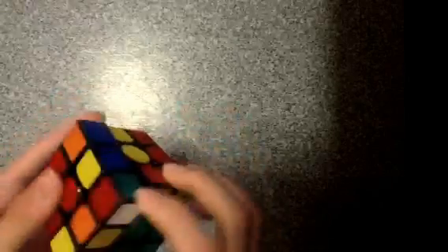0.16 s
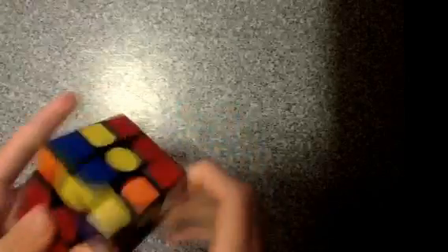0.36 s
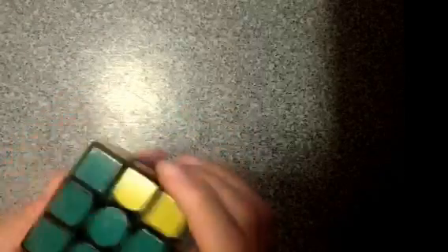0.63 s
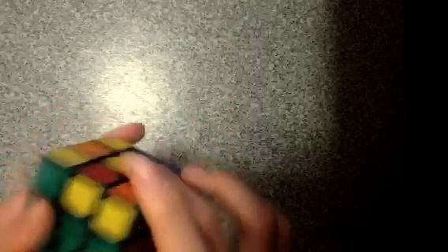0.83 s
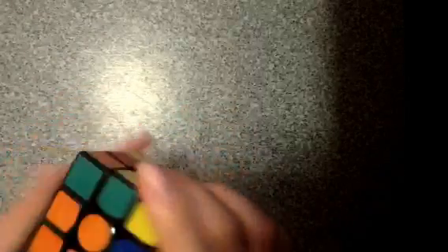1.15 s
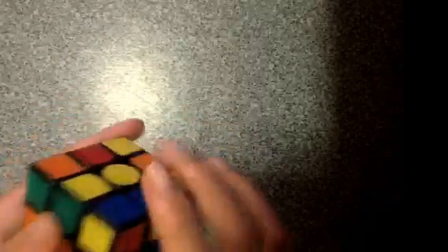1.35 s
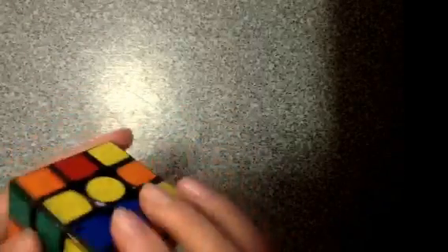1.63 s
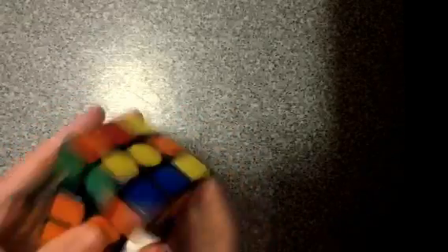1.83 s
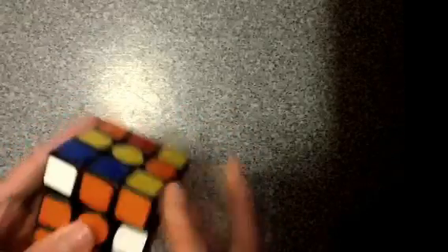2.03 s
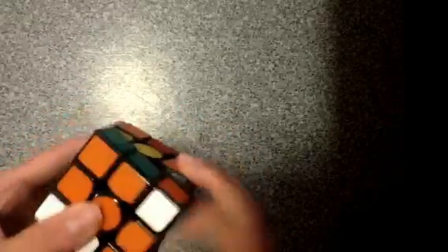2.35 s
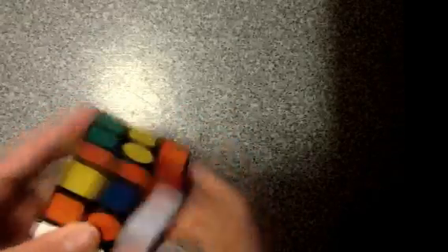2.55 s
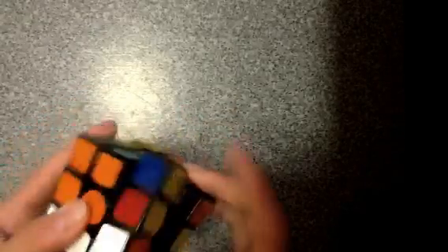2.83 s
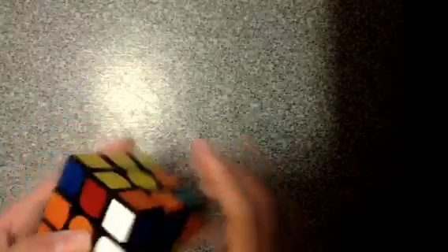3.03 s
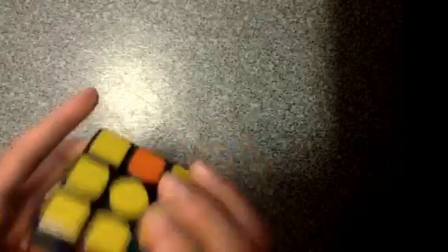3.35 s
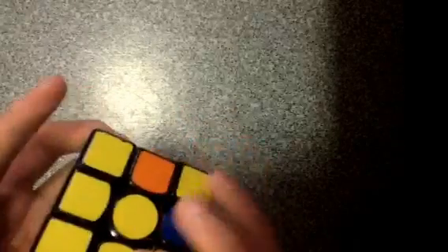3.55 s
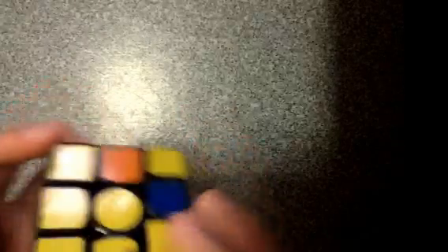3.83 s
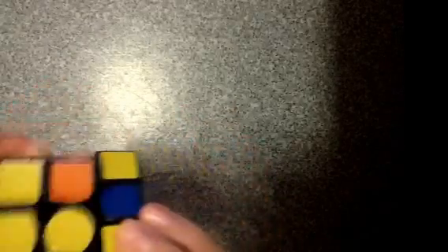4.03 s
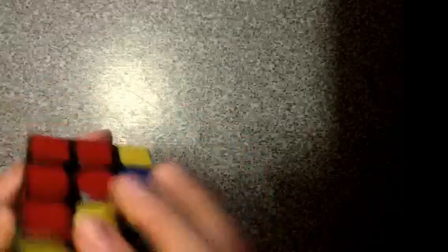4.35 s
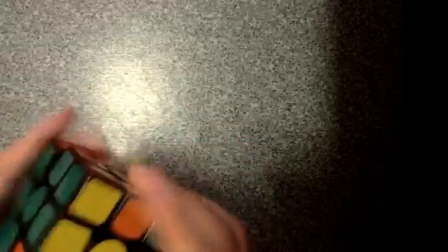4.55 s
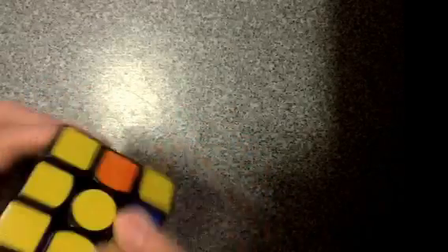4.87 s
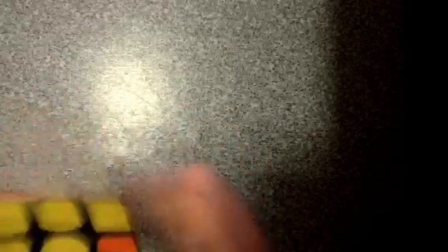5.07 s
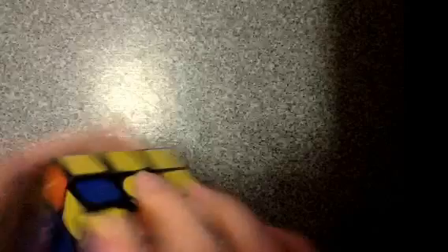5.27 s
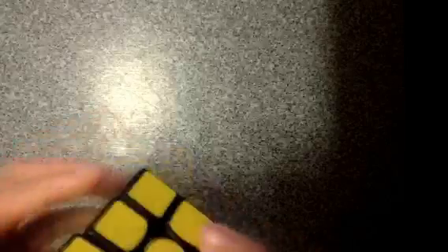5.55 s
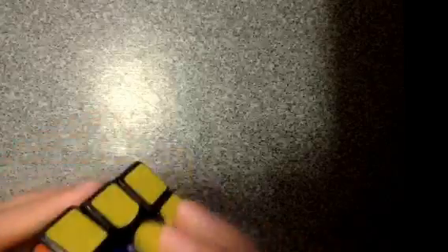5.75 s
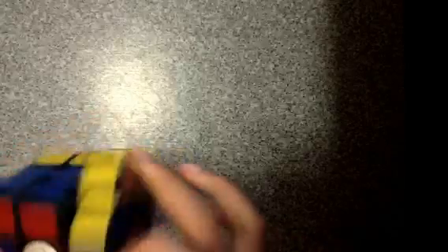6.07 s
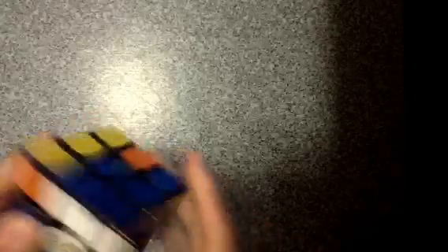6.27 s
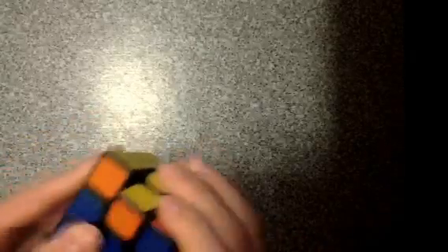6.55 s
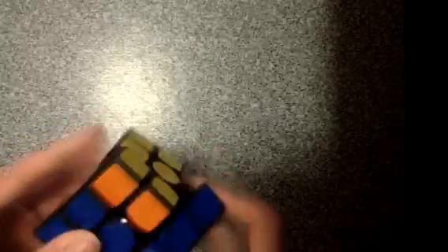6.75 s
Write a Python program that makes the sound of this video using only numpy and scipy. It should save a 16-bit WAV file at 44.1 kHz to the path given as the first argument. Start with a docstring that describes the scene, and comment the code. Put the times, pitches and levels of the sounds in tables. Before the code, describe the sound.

A plastic puzzle cube is twisted by hand in quick uneven bursts of sharp clacks and scrapes, close up over a faint indoor hum.

```python
"""At a desk in a small room, a plastic speed cube is turned by hand in quick bursts, heard close up.
Noise bursts ringing through resonances make the clacks, the seam rattle and the loose ticks.
Gritty friction noise makes the scrapes and soft rubbing; wavering sine tones make faint squeaks.
The room answers with a short diffuse tail, over a fan of unsteady low tones and soft air."""
import sys
import numpy as np
from scipy import signal
from scipy.fft import rfft, irfft, next_fast_len
from scipy.io import wavfile
from scipy.ndimage import uniform_filter1d, map_coordinates

SR = 44100
rng = np.random.default_rng(int(sys.argv[2]) if len(sys.argv) > 2 else 0)


def materialize(psi):
    """Save the field psi as 16-bit PCM at rate SR to the path in sys.argv[1].

    A 1-D psi becomes a single channel; in a 2-D psi each row is a channel.
    """
    bounded = np.clip(np.atleast_2d(psi).T, -1, 1)
    quanta = np.round(bounded * 32767).astype(np.int16)
    wavfile.write(sys.argv[1], SR, quanta)


N = 304290  # length in samples

# All source levels below are set ahead of the trims in the functions and the mix.
# A piece catches or drops into line: start_s, level_db (rms of the first 3 ms), brightness_db
CLACK_EVENTS = [(0.0279, -31.5, -3.5), (0.039, -29, 4), (0.099, -26, 3), (0.113, -20, 7), (0.1192, -12, 4),
                (0.2598, -42.5, 0), (0.3147, -48, -2), (0.3682, -41.5, 3.5), (0.4268, -30.5, -2.5),
                (0.443, -24, 1), (0.4677, -29.5, 6), (0.4968, -33, 0), (0.5191, -22.5, 4),
                (0.8943, -48.5, -7), (1.0383, -53, -10), (1.28, -54, -8), (1.768, -34.5, 4),
                (1.7949, -33, -0.5), (1.9146, -29, 3), (1.9415, -32.5, -12), (2.147, -50.5, -7),
                (2.2802, -29.5, 4.5), (2.293, -27, 2), (2.303, -25, 6), (2.3595, -40, 3), (2.405, -32.5, 5),
                (2.5005, -32, 4), (2.5088, -19, 5.5), (2.568, -24, 1), (2.5784, -23.5, 5.5),
                (2.5902, -26.5, 0), (2.632, -34, -6), (2.646, -29.5, 5.5), (2.8063, -38, -0.5),
                (2.8568, -39, -13), (2.8668, -42, 4), (2.9494, -13.5, 5), (2.9595, -20.5, 9),
                (3.1926, -41.5, -5), (3.233, -28.5, 1.5), (3.455, -52, -3), (3.632, -51.5, -2.5),
                (4.0792, -41.5, -2), (4.1632, -33.5, 2), (4.2977, -34, 3.5), (4.504, -48.5, -14),
                (4.562, -50.5, -8), (4.6792, -43, -5), (4.766, -30.5, -1), (4.851, -24.5, 0.5),
                (4.8597, -22, 1.5), (4.9825, -46.5, -7), (5.162, -39, 9), (5.1995, -46, -5),
                (5.5308, -44.5, -5.5), (5.7213, -45.5, 6.5), (5.848, -41.5, -5), (5.8943, -30.5, 3),
                (5.9115, -30, 2), (5.921, -35, -3), (5.981, -36.5, 2), (6.007, -29, 0),
                (6.0157, -27.5, 0.5), (6.037, -27.5, 11), (6.0607, -23, 6), (6.0723, -19.5, 2.5),
                (6.121, -29, 1), (6.126, -26, 0), (6.182, -41, -6), (6.2335, -36.5, 0), (6.3687, -47.5, -1),
                (6.4027, -38.5, -5), (6.4541, -41, -12), (6.489, -26, 0.5), (6.5964, -36.5, 2),
                (6.6596, -39.5, -6), (6.7233, -31.5, 2.5), (6.775, -40.5, 2), (6.7985, -43, -6),
                (6.8314, -32, 3), (6.8531, -21.5, 2)]
# A layer slides round over the seams: start_s, end_s, scrape_end_db, rattle_db
LAYER_TURNS = [(0, 0.038, -38.5, -37), (0.096, 0.128, -27.5, -30.5), (0.424, 0.469, -38.5, -42),
               (0.496, 0.54, -33, -40), (1.763, 1.782, -49, -41.5), (1.88, 1.956, -44.5, -42),
               (2.28, 2.317, -33, -31), (2.465, 2.523, -54, -37.5), (2.544, 2.606, -33.5, -38),
               (2.626, 2.659, -38, -36), (2.683, 2.727, -38, -33.5), (2.912, 2.939, -41, -42.5),
               (2.939, 2.959, -20.5, -30), (4.814, 4.837, -41.5, -43), (4.843, 4.868, -30, -31),
               (5.86, 5.946, -40, -35.5), (5.997, 6.078, -49, -43), (6.117, 6.238, -47, -41.5),
               (6.446, 6.475, -50, -39), (6.689, 6.733, -46.5, -45.5), (6.812, 6.861, -37.5, -43)]
# The layers rub while the hands work the cube: start_s, end_s, level_db
RUB_SPELLS = [(0, 0.5, -54), (1.741, 1.95, -57.5), (2.268, 2.74, -56.5), (4.77, 4.853, -59),
              (5.837, 6.23, -52), (6.41, 6.9, -58.5)]
# Faint squeaks as the grip shifts: start_s, length_s, pitch_hz (average), level_db (rms)
GRIP_SQUEAKS = [(3.68, .12, 3690, -75), (4.681, 0.073, 3040, -70), (5.363, 0.1, 3150, -67),
                (5.744, 0.14, 3249, -67.5), (6.255, .1, 2550, -69.5), (6.515, .12, 3260, -66)]
# Colour of a contact between the plastic walls: frequency_hz, gain_db
SHELL_COLOUR = [(25, -66.5), (150, -23), (450, -22.5), (850, -7.5), (1500, -3), (2400, -3), (4200, -1.5),
                (6200, 1.5), (8200, 0), (10500, -6.5), (15000, -7.5)]
# Resonances of the hollow cubies and their walls: frequency_hz, width_hz, height_db (over the shell colour)
CUBIE_MODES = [(1641, 78, 9), (1804, 130, 3.5), (2400, 90, 4), (2597, 30, 1.5), (3140, 80, 4.5),
               (4800, 73, -1), (5950, 100, 2.5), (7540, 71, 3), (8110, 120, 1.5), (9020, 82, 5),
               (9490, 120, -0.5), (11000, 80, 2.5)]
# Colour of soft rubbing: frequency_hz, gain_db
RUB_COLOUR = [(100, -52.5), (700, -11), (1300, -4), (1680, -1.5), (2100, -8.5), (2700, -8), (6000, -10.5),
              (15000, -14)]
# Decay of the room tail: frequency_hz, t60_s
ROOM_DECAY = [(300, 0.46), (1600, 0.23), (4000, 0.24), (8000, 0.28), (15000, 0.2)]
# Low tones of the fan: frequency_hz, level_db (rms), width_hz
FAN_TONES = [(102.7, -76.5, 5), (146, -64.5, 10), (159.3, -65, 6), (190, -62, 8), (200.8, -66, 11),
             (300.9, -62.5, 9), (432.5, -68, 16), (654, -73, 13), (891, -71.5, 15)]
# Relative colour of the fan's air: frequency_hz, density_db (per Hz)
FAN_AIR = [(25, -28.5), (55, -24.5), (75, -15), (110, -3.5), (170, 0), (250, -3), (450, -2), (650, -8),
           (1000, -9.5), (2000, -17), (4000, -23), (7500, -26), (10000, -26.5), (15000, -28.5)]

CONTACT_SAMPLES = 4096  # length of one contact sound
LEAD_S = 0.012  # catching ahead of the snap
SEAM_GAP_S, SEAM_SCATTER_DB = 0.008, 2.5  # average time from seam to seam, spread of their strength
RUB_RISE_DB_PER_S, RUB_FALL_DB_PER_S = 400, 180
# the whole fan sinks for a moment and recovers
DIP_S, DIP_DB, DIP_FALL_S, DIP_RECOVER_S = 2.93, -3, 0.067, 2.2
FAN_TRIM_DB = 0.22
TOP_HZ = 15350  # start of the steep treble cut


def clacks(loose_db=-60, loose_scatter_db=3, loose_bright_db=-5, count=20):
    """Pieces catch on each other and drop into line; loose ones tick faintly as the grip shifts."""
    track = np.zeros(N)
    for start_s, level_db, bright_db in CLACK_EVENTS:
        add(track, start_s - LEAD_S, contact(level_db, bright_db))
    for start_s in rng.random(count) * N / SR:
        level_db = loose_db + loose_scatter_db * rng.standard_normal()
        add(track, start_s, contact(level_db, loose_bright_db))
    return track


def contact(level_db, bright_db, soft_db=-30, hard_db=-15,
            hollow_db=1.5, hollow_per_bright=0.8, sharp_db=1.0, sharp_per_bright=1.2):
    """A click of a given level: the brighter it is, the less it stirs the cavities."""
    force = np.interp(level_db, [soft_db, hard_db], [0, 1])
    hollow = hollow_db - hollow_per_bright * bright_db
    sharp = sharp_db + sharp_per_bright * bright_db
    return amp(level_db) * click(hollow, sharp, force)


def click(hollow_db, sharp_db, force, body_hz=760, body_width_hz=300, body_db=7.0,
          t60=0.02, snap_t60=0.0051, snap_db=4.0, catch_db=-11, catch_t60=0.025,
          landing_s=0.0009, touch_s=0.0004, edge_db=3.0):
    """One contact: after a short catch, a snap and a brief clatter ring the hollow cubies."""
    time = np.arange(CONTACT_SAMPLES) / SR - LEAD_S
    distance = np.abs(time)
    # the edges grate ever harder, then let go and strike
    catch = amp(catch_db - 60 * distance / catch_t60)
    clatter = amp(-60 * distance / t60)
    envelope = np.where(time < 0, catch, clatter)
    # a light touch snaps at once, a hard blow lands more gradually and dies more slowly
    landing = np.exp(-(time / (touch_s + force * landing_s)) ** 2) * (time < 0)
    snap = (time >= 0) * amp(-60 * distance / (snap_t60 * (1 + force)))
    envelope += amp(snap_db) * (landing + snap)
    # the edges chatter as they meet
    knots = CONTACT_SAMPLES // 40
    chatter = np.interp(np.arange(CONTACT_SAMPLES), np.linspace(0, CONTACT_SAMPLES, knots),
                        rng.uniform(-1, 1, knots))
    envelope *= amp(edge_db * chatter)
    # flat contacts stir the cavities, corner contacts the treble
    spot_colour = [(400, 0.019), (1100, hollow_db), (2000, hollow_db),
                   (3200, 0.0092), (7500, 0), (10500, sharp_db)]
    # the harder the blow, the more it shakes the whole cube
    modes = list(CUBIE_MODES) + own_modes() + [(body_hz, body_width_hz, force * body_db)]
    burst = rng.uniform(-0.97, 1, CONTACT_SAMPLES) * envelope
    sound = coloured(burst, lambda f: along(SHELL_COLOUR, f) + along(spot_colour, f) + resonance(f, modes))
    first_3_ms = sound[(time > 0) & (time < 0.003)]
    return sound / np.sqrt(np.mean(first_3_ms ** 2))


def own_modes(low_hz=1300, high_hz=8000, relative_width=0.078, height_db=5.0, count=4):
    """Each piece, struck at another spot, adds a few resonances of its own."""
    centres = low_hz * (high_hz / low_hz) ** rng.random(count)
    return [(hz, relative_width * hz, height_db) for hz in centres]


def rattle(bright_db=-0.5, bright_scatter_db=4):
    """A turning layer ticks over the seams at uneven intervals."""
    track = np.zeros(N)
    for start_s, end_s, _, level_db in LAYER_TURNS:
        seams = max(1, round((end_s - start_s) / SEAM_GAP_S))
        for k in range(seams):
            seam_s = start_s + (end_s - start_s) * (k + rng.random()) / seams
            strength, colour = rng.standard_normal(2)
            tick = contact(level_db + SEAM_SCATTER_DB * strength, bright_db + bright_scatter_db * colour)
            add(track, seam_s - LEAD_S, tick)
    return track


def scrapes(grain_db=5.5, rise_db=5, level_db=-1.5, hollow_db=2, rub_db=-2, rub_grain_db=9.0):
    """Sliding layers drag over the seams, harder until they stop; soft rubbing joins as the hands work."""
    t = np.arange(N) / SR
    drag = np.zeros(N)
    for start_s, end_s, end_db, _ in LAYER_TURNS:
        times = [start_s - 0.004, start_s, end_s, end_s + 0.006]
        drag += amp(np.interp(t, times, [-120, end_db - rise_db, end_db, -120]))
    flat_contact = [(800, 0), (1600, hollow_db), (3000, 0)]
    scrape = unit(filtered(grating(grain_db), lambda f: amp(
        along(SHELL_COLOUR, f) + along(flat_contact, f) + resonance(f, CUBIE_MODES))))

    pressure = np.zeros(N)
    for start_s, end_s, spell_db in RUB_SPELLS:
        rise = RUB_RISE_DB_PER_S * np.maximum(start_s - t, 0)
        fall = RUB_FALL_DB_PER_S * np.maximum(t - end_s, 0)
        pressure += amp(spell_db - rise - fall)
    rub = unit(filtered(grating(rub_grain_db), lambda f: amp(
        along(RUB_COLOUR, f) + resonance(f, CUBIE_MODES))))
    return amp(level_db) * drag * scrape + amp(rub_db) * pressure * rub


def grating(grain_db):
    """Friction noise of rms 1 that sticks and slips every few milliseconds, with a limit to the grip."""
    grip = np.minimum(wobble(700) + wobble(170), 2)
    return unit(rng.standard_normal(N) * amp(grain_db * grip))


def squeaks(waver=0.015, rough=0.062):
    """Plastic sticks and slips on plastic in a thin, unsteady tone that swells and fades."""
    track = np.zeros(N)
    # running time with slow and fast pitch wander
    bent_time = np.cumsum(1 + waver * wobble(40) + rough * wobble(900)) / SR
    for start_s, length_s, pitch_hz, level_db in GRIP_SQUEAKS:
        span = slice(round(start_s * SR), round((start_s + length_s) * SR))
        tone = np.sin(2 * np.pi * pitch_hz * bent_time[span])
        add(track, start_s, amp(level_db) * unit(tone * signal.windows.tukey(len(tone))))
    return track


def room(x, gap_s=0.006, size=256, ring_share=0.28):
    """A diffuse field stores the energy of each band and lets it die away as fresh noise."""
    hz, t, bands = signal.stft(x, SR, nperseg=size)
    power = np.abs(uniform_filter1d(np.abs(bands) ** 2, size=9, axis=0))
    # share of the energy that survives each frame
    kept = amp(-60 * t[1] / along(ROOM_DECAY, hz)) ** 2
    stored = np.array([signal.lfilter([1 - k], [1, -k], band) for k, band in zip(kept, power)])
    noise = signal.stft(rng.standard_normal(N), SR, nperseg=size)[2]
    tail = signal.istft(noise / noise.std() * np.sqrt(stored), SR)[1]
    wet = np.zeros(N)
    add(wet, gap_s, tail)
    # the tail carries the pitch of the cubies with it
    walls = [(500, -9), (1650, 1.5), (3500, -1), (7000, -2.0), (14000, -2.0)]
    return filtered(wet, lambda f: amp(along(walls, f) + ring_share * resonance(f, CUBIE_MODES)))


def fan(air_db=-56.5, waver_db=0.5):
    """Unsteady low tones hum over a soft rush of air; both dip together once."""
    t = np.arange(N) / SR
    air = unit(filtered(rng.standard_normal(N), lambda f: amp(along(FAN_AIR, f))))
    air_level = amp(air_db + waver_db * wobble(4.275))
    hum = np.zeros(N)
    for hz, level_db, width_hz in FAN_TONES:
        # the wider a tone, the faster it drifts and flutters
        flutter = amp(3.2 * wobble(2 * width_hz))
        drift = 1.33 * wobble(2 * width_hz)
        hum += amp(level_db) * unit(flutter * np.sin(2 * np.pi * hz * t + drift))
    dip = np.interp(t - DIP_S, [0, DIP_FALL_S, DIP_FALL_S + DIP_RECOVER_S], [0, 1, 0])
    return amp(FAN_TRIM_DB + DIP_DB * dip) * (hum + air_level * air)


def amp(db):
    """Decibels to gain."""
    return 10 ** (np.asarray(db) / 20)


def unit(x):
    """Scale to rms 1."""
    return x / np.sqrt(np.mean(x ** 2) + 1e-20)


def along(points, hz):
    """Read (frequency_hz, value) points on a log frequency axis."""
    f, v = np.transpose(points)
    return np.interp(np.log(hz + 1), np.log(f), v)


def wobble(rate):
    """A smooth random curve with rate knots a second."""
    knots = rng.standard_normal(int(N * rate / SR) + 4)
    return map_coordinates(knots, [np.arange(N) * rate / SR])


def resonance(hz, modes):
    """Gain in dB that modes of frequency_hz, width_hz, height_db add at each frequency."""
    return sum(db / (1 + (2 * (hz - centre) / width) ** 2) for centre, width, db in modes)


def filtered(x, gain):
    """Filter a full-length track by a real gain of frequency, without phase shift."""
    m = next_fast_len(N + SR // 2)
    return irfft(rfft(x, m) * gain(np.fft.rfftfreq(m, 1 / SR)), m)[:N]


def coloured(x, level):
    """Filter a contact sound causally (minimum phase); level gives dB for each frequency."""
    cepstrum = irfft(np.log(amp(level(np.fft.rfftfreq(CONTACT_SAMPLES, 1 / SR)))))
    # fold the cepstrum forward in time so the ringing only follows the strike
    cepstrum[1:CONTACT_SAMPLES // 2] *= 2
    cepstrum[CONTACT_SAMPLES // 2 + 1:] = 0
    return irfft(rfft(x) * np.exp(rfft(cepstrum)))


def add(track, start_s, sound):
    """Mix a sound into the track at start_s, cut off at the track's end."""
    start = max(0, round(start_s * SR))
    part = track[start:start + len(sound)]
    part += sound[:len(part)]


def scene():
    """Mix the cube, its room tail and the fan."""
    cube = amp(-1.5) * clacks() + amp(-2.5) * rattle() + scrapes() + squeaks()
    return (cube + amp(-10.5) * room(cube) + fan())[None]


def record(dry):
    """Cut the treble above the band limit, sinking 100 dB within 900 Hz."""
    return filtered(dry[0], lambda f: amp(np.interp(f, [TOP_HZ, TOP_HZ + 900], [0, -100])))[None]


dry = scene()
out = record(dry)
materialize(out)
```